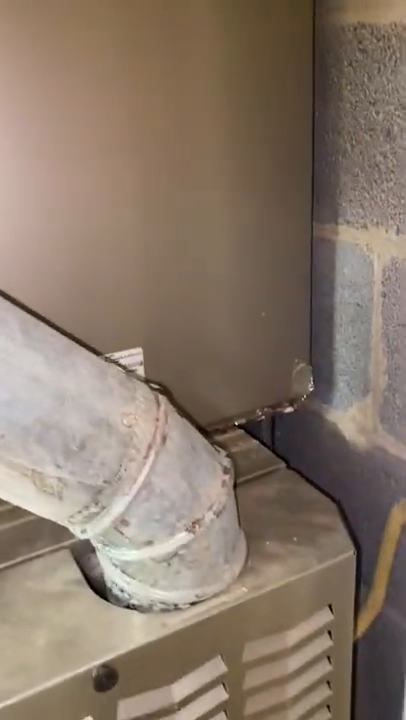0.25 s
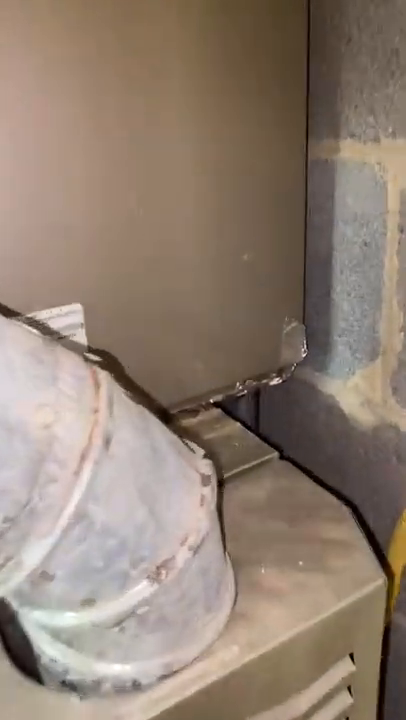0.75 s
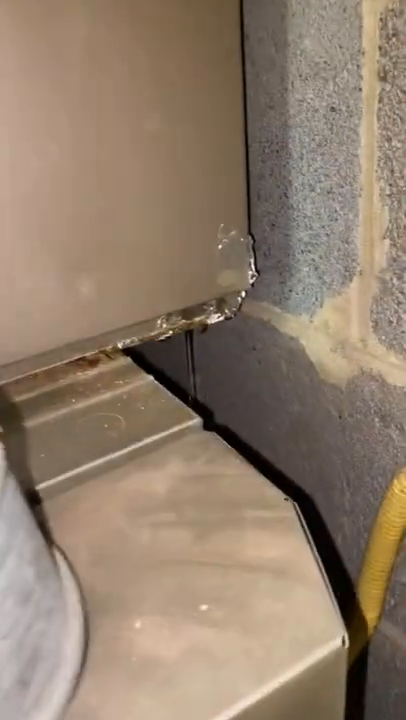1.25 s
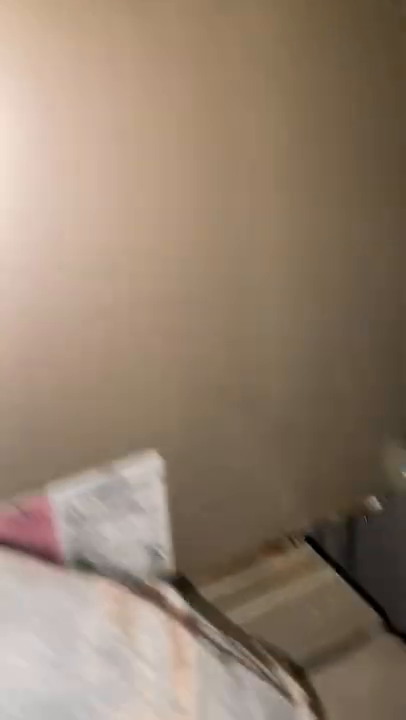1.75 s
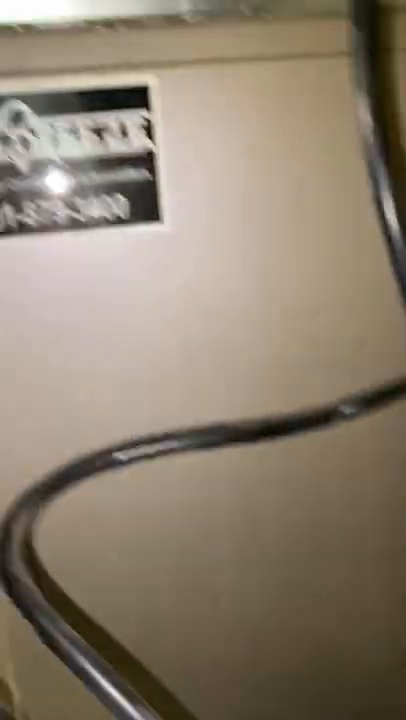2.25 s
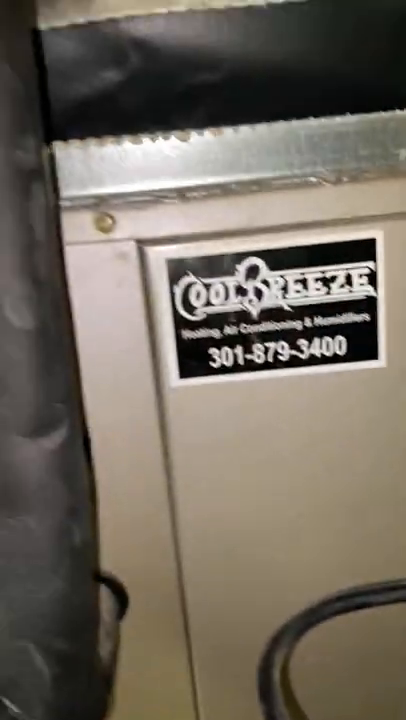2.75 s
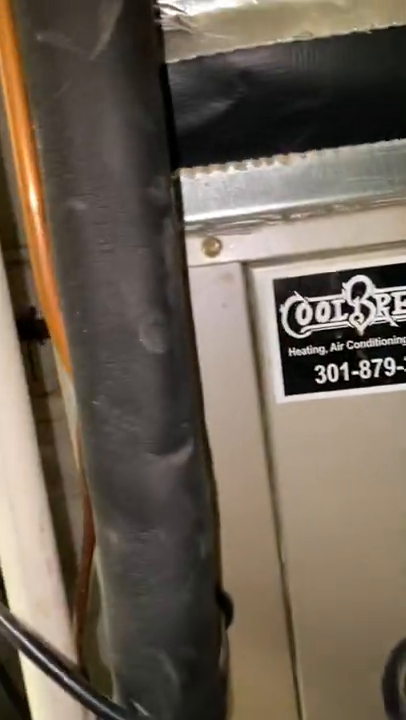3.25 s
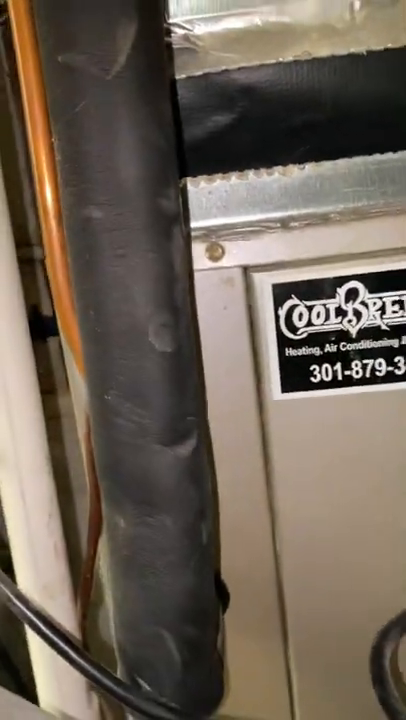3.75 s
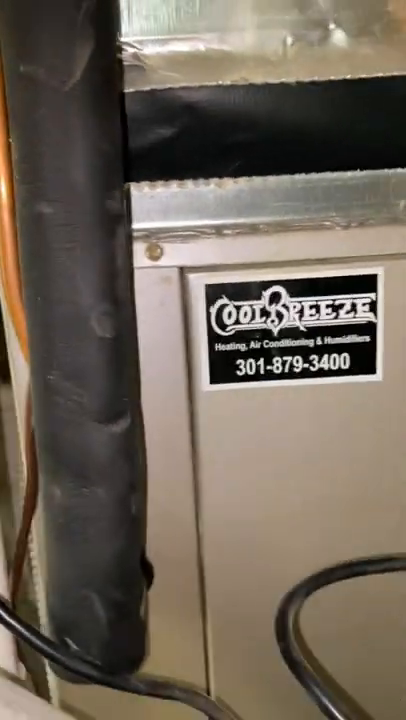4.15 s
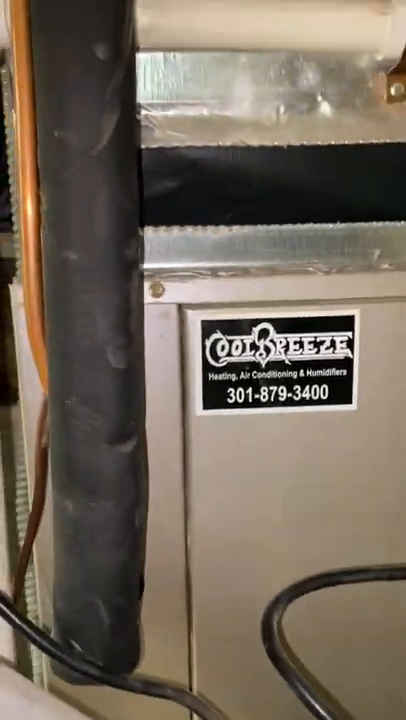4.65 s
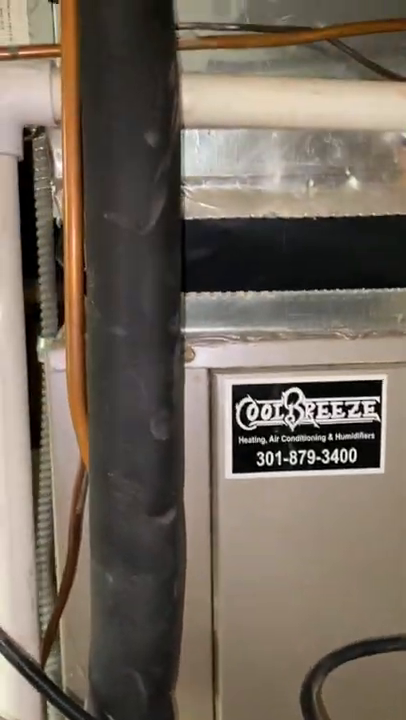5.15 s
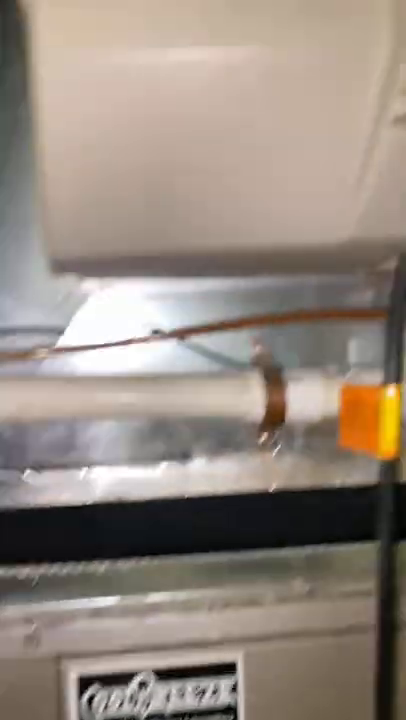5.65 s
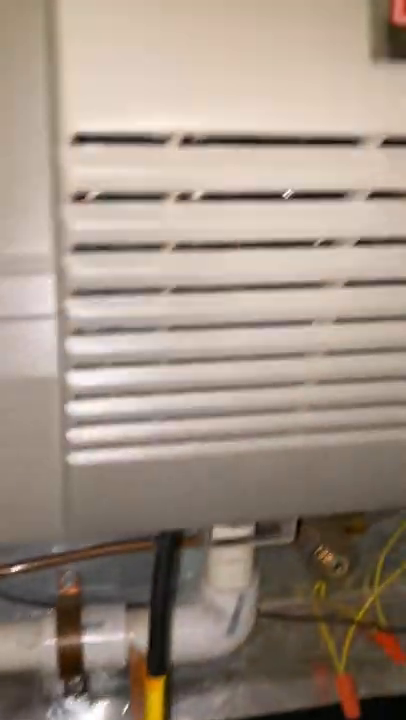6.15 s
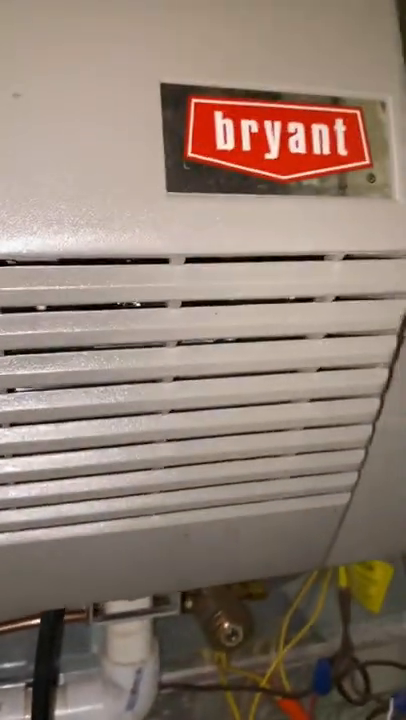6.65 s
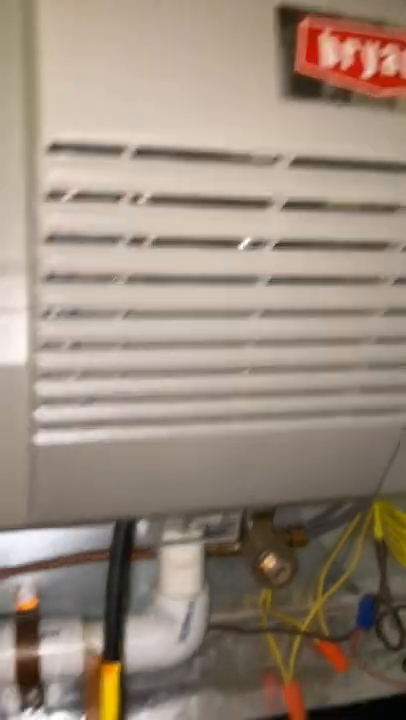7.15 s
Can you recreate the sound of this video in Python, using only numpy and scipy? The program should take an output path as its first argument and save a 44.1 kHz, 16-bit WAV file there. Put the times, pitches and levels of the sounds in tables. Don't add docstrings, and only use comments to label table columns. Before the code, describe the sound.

Close stereo phone pickup of a running blower: low mains hum beating against the fan wheel, a faint steady whine leaning left at first and later centred, and broad airy roar with wavering pipe-like whistles. A few tiny metallic ticks occur in the first second and a half, then fingers bump the phone body repeatedly. The later part is mostly steady hum and rushing air, fuller near the grille, with isolated taps to the end.

```python
import sys
import numpy as np
from scipy import signal
from scipy.fft import rfft, irfft
from scipy.io import wavfile
from scipy.ndimage import uniform_filter1d

SR = 44100
rng = np.random.default_rng(int(sys.argv[2]) if len(sys.argv) > 2 else 0)


def rack_gain(trim_db):
    fader = np.asarray(trim_db, float)
    return 10 ** (fader / 20)


def store_pcm(level_fs):
    pcm = np.round(np.clip(level_fs, -1, 1) * 32767).astype(np.int16)
    wavfile.write(sys.argv[1], SR, np.atleast_2d(pcm).T)


N = 326781


def evened(x):
    return x / np.sqrt(np.mean(x ** 2) + 1e-20)


def wander(count, size):
    return evened(uniform_filter1d(rng.standard_normal(count), size=size))


def blurred(noise, bins, frames):
    return evened(uniform_filter1d(uniform_filter1d(noise, size=bins, axis=0), size=frames, axis=1))


def over_time(rows, t):
    s, *columns = np.transpose(rows)
    return np.array([np.interp(t, s, column) for column in columns])


def over_hz(points, values, hz):
    return np.interp(np.log(hz + 1), np.log(np.asarray(points) + 1), values)


def add(mix, s, sound):
    part = mix[:, round(s * SR):][:, :sound.shape[1]]
    part += sound[:, :part.shape[1]]


# [time_s, nearness_to_cabinet_db, facing_duct_seam_db, facing_grille_db]
PHONE_WALK = [(0, -5.5, -5.5, 2), (.4, -3, -2.5, -1), (.8, -2, -3.5, 1), (1.2, -1, -5, -0.5),
              (1.6, 1, -6.5, -2.5), (1.85, 0, -2.5, -1.5), (2.1, 0.1, 3, -0.2), (2.6, 0.7, 2.5, 0),
              (3.2, 0.7, 1.3, -0.1), (3.8, 1.1, 1.6, -1.3), (4.4, 1.4, 3, 0), (5.1, 0.2, 3, 2),
              (5.4, 2.5, -0.3, 4.5), (5.7, 3, -1.5, 8.5), (6.0, 4, 1.5, 9), (6.4, 6.5, -4.5, 10.5),
              (6.9, 3.5, 0, 10), (7.41, 3.5, -1.5, 7.5)]
# [time_s, lead_turns]
SHAFT_LEAD = [(0, .075), (.4, .09), (1.6, .078), (2.4, .11), (4.4, .121), (5.6, .092), (6.4, .097),
              (6.8, .08), (7.41, .078)]
TONE_ORDERS = [
    (0, 1),
    (0, 2),
    (5, 0),
    (10, 0),
    (22, 0),
    (22, 1),
]
# [rest_level_db, share_of_nearness, share_of_duct, share_of_grille]
TONE_LEVELS = [(-36, 1.1, -0.14, -0.0017), (-47, 1.1, 0.67, -0.49), (-38, 1.3, -0.016, -0.11),
               (-43.5, 0.092, -0.1, 0.81), (-53.5, 1.32, 0.71, 0.31), (-52, 0.01, -.1, 0.92)]
# [shaft_order, hum_multiple, level_under_slot_tone_db]
SLOT_PARTNERS = [(22.23, 2, -7), (22.23, -1, -12.5), (23.2, 1, -11.5), (14.93, 0, -26), (0, 3, -13),
                 (1.013, 2, -6), (19.4, 0, -14)]
# [time_s, left_minus_right_db]
SLOT_PAN = [(0, 23), (2.5, 25), (4.5, 5), (5.5, 2), (7.41, 3)]


def motor():
    hum_hz, hum_start_turns, shaft_hz = 120.0, -.16, 22.52
    waver_db, full_waver_hz = 3, 450
    t = np.arange(N) / SR
    hum = hum_hz * t + hum_start_turns
    shaft = shaft_hz * t + over_time(SHAFT_LEAD, t)[0]

    def tone(order, multiple, db):
        return np.sqrt(2) * rack_gain(db) * np.cos(2 * np.pi * (order * shaft + multiple * hum))

    levels = np.array(TONE_LEVELS)
    *low_db, slot_db = levels[:, :1] + levels[:, 1:] @ over_time(PHONE_WALK, t)
    tones = [(order, multiple, db) for (order, multiple), db in zip(TONE_ORDERS, low_db)]
    tones += [(order, multiple, slot_db + db) for order, multiple, db in SLOT_PARTNERS]

    drifts = rng.standard_normal((N // 441 + 1, len(tones)))
    drifts = evened(uniform_filter1d(drifts, size=12, axis=0))
    low = 0
    for (order, multiple, db), drift in zip(tones, drifts.T):
        drift = np.interp(t, np.arange(len(drift)) / 100, drift)
        pitch_hz = order * shaft_hz + multiple * hum_hz
        depth_db = waver_db * min(pitch_hz / full_waver_hz, 1) ** 2
        low = low + tone(order, multiple, db + depth_db * drift)

    flutter_db = 2.36 * wander(N, 3000)
    left = 1 / (1 + rack_gain(-over_time(SLOT_PAN, t)[0]))
    return low + 2 * np.array([left, 1 - left]) * tone(*TONE_ORDERS[-1], slot_db + flutter_db)


# [peak_s, pipe_hz, lift_db, rise_s, fall_s]
PIPE_BEAMS = [(0.01, 1331, 11, 0.19, .2), (2.22, 1331, 8.5, .25, 0.49), (4.1, 3995, 8.5, 0.17, 0.3),
              (6.3, 3505, 5, 0.12, 0.16), (7.0, 3995, 4, .3, 0.23), (2.15, 1954, 4, 0.052, 0.41),
              (5.05, 1954, 6, 0.18, 0.18), (2.1, 937, -13, 0.62, 0.49), (7.13, 1040, 3.5, 0.38, .3),
              (0.57, 1954, -4, 0.13, 0.16)]


def beam_db(pipe_hz, t):
    lift = 0
    for peak_s, hz, db, rise_s, fall_s in PIPE_BEAMS:
        if abs(np.log2(hz / pipe_hz)) < 1 / 10:
            lift = lift + db * np.exp(-((t - peak_s) / np.where(t < peak_s, rise_s, fall_s)) ** 2)
    return lift


# [pitch_hz, level_db_per_hz]
AIR_ROAR = [(25, -116), (47, -61), (85, -54.5), (215, -59.5), (270, -64.5), (700, -72), (1050, -77),
            (1500, -82), (2150, -78), (2560, -85), (3000, -78.5), (4400, -84.5), (5200, -85.5),
            (10500, -85.5), (16000, -88)]
# [pitch_hz, share_of_nearness, share_of_duct, share_of_grille]
ROAR_SHARES = [(70, 0.79, 0.17, 0.01), (366, 0.19, 0.01, 0.24), (910, 0.74, 0.33, 0.41),
               (3250, 0.18, 0.14, 0.16), (7500, .5, .3, 0.17), (10600, 0.27, .5, .1),
               (14000, 0.77, 0.46, .2)]
# [pitch_hz, width_hz, rest_level_db, share_of_duct, share_of_grille]
DUCT_PIPES = [(1322, 60, -56, 0.54, 0.01), (1965, 60, -50, 1.2, 0.06), (2297, 34, -56.5, 0.55, 0.2),
              (1800, 74, -56, 1.7, 0.092), (1042, 70, -53, 0.69, 0.51), (948, 39, -55, 1.2, .4),
              (4730, 170, -60.5, 0.27, 0.56), (3505, 80, -55.5, 1.2, 0.27), (3980, 98, -58.5, 1.2, 0.46),
              (5050, 120, -66, .2, 0.96), (2934, 45, -66, 0.25, .3)]
# [pitch_hz, likeness_0_to_1, right_lag_radians]
PORTS = [(60, .999, 0), (200, .99, 0), (350, .9, 0), (800, .58, -.2), (1400, .6, 0), (1950, .95, .2),
         (2800, .5, .7), (4000, .8, .5), (4600, .6, 1.5), (5500, .85, .7), (7350, .93, 3.14),
         (10600, .93, 6.28), (13600, .93, 9.42), (16300, .93, 12.56)]


def air():
    streak_db, patch_db, gust_db = 2.5, 1.1, .7
    size, hop = 2048, 512
    frames, hz = N // hop + 5, np.fft.rfftfreq(size, 1 / SR)
    t = np.arange(frames) * hop / SR
    a, b, c, d, streaks, patches, slant = rng.standard_normal((frames, len(hz), 7)).T

    streaks = blurred(streaks, bins=4, frames=40)
    streaks = streaks * np.interp(hz, [0, 800, 2500, 9000], [0, .8, 1.5, 1.7])[:, None]
    patches = blurred(patches, bins=25, frames=6)
    gusts = wander(frames, 3) * np.clip(hz / 8000, 0, 1)[:, None]

    walk_db = over_time(PHONE_WALK, t)
    shares = np.array(ROAR_SHARES)
    place_db = shares[:, 1:] @ walk_db
    place_db -= place_db.mean(1, keepdims=True)
    moved_db = np.array([over_hz(shares[:, 0], column, hz) for column in place_db.T]).T
    roar_db = over_hz(*np.transpose(AIR_ROAR), hz)[:, None]
    power = rack_gain(roar_db + moved_db + streak_db * streaks / 2) ** 2
    for pipe_hz, width, db, duct, grille in DUCT_PIPES:
        shape = 1 / (1 + (2 * (hz - pipe_hz) / width) ** 2) ** 2 / width
        pipe_db = db + duct * walk_db[1] + grille * walk_db[2] + beam_db(pipe_hz, t)
        power = power + shape[:, None] * rack_gain(pipe_db) ** 2

    port_hz, same, lag = np.transpose(PORTS)
    same = np.clip(over_hz(port_hz, same, hz), 0, 1)[:, None]
    sway = 1 + 0.027 * wander(frames, 3)
    slant = blurred(slant, bins=8, frames=40)
    slant_hz, slant_radians = [300, 1200, 1950, 2800, 5500, 6500], [0, .5, .3, .9, .7, .2]
    slant = slant * np.interp(hz, slant_hz, slant_radians)[:, None]
    turn = np.exp(-1j * (np.interp(hz, port_hz, lag)[:, None] * sway + slant))
    left = a + 1j * b
    right = turn * (same * left + np.sqrt(1 - same ** 2) * (c + 1j * d))
    z = np.array([left, right])
    z *= np.sqrt(power * SR / size)
    z *= rack_gain(streak_db * streaks / 2 + patch_db * patches + gust_db * gusts)
    return 1.068 * signal.istft(z, nperseg=size, noverlap=size - hop)[1][:, :N]


# [start_s, peak_db]
FINGER_KNOCKS = [(.345, -42), (0.525, -40), (1.579, -34), (1.597, -33), (1.605, -27), (1.637, -28),
                 (1.65, -39), (1.718, -30), (1.758, -29), (1.838, -35), (1.877, -26.5), (1.905, -26),
                 (2.047, -36), (2.2, -23), (2.277, -26), (2.339, -24), (2.411, -26), (3.38, -48),
                 (3.807, -32), (4.197, -47), (4.94, -34), (5.881, -39), (6.642, -39), (7.158, -26),
                 (7.367, -43), (7.376, -26)]


def knocks():
    turns, bend_s, rise_s, fade_s = 1.99, 0.00129, 0.00042, 0.013
    out, t = np.zeros((2, N)), np.arange(1600) / SR
    for (s, db), (u, v) in zip(FINGER_KNOCKS, rng.random((len(FINGER_KNOCKS), 2))):
        phase_turns = turns * (0.82 + 0.15 * u) * np.log(1 + t / bend_s) + v
        sweep = np.sin(2 * np.pi * phase_turns)
        sweep *= (1 - 0.52 * np.exp(-t / rise_s)) * np.exp(-(t / fade_s) ** 2)
        add(out, s, rack_gain(db + 1.5) * np.outer([1, -.75], sweep))
    return out


# [start_s, level_db, pitch_hz, width_hz, time_to_fall_60_db_s]
METAL_TICKS = [(.553, -37.5, 10000, 3000, 0.036), (.691, -30, 2220, 250, 0.035),
               (.692, -29, 630, 393, 0.093), (.705, -28.5, 330, 500, 0.036),
               (1.609, -35.5, 1300, 1200, 0.035), (1.655, -40.5, 650, 400, 0.057),
               (.882, -30.5, 10200, 9000, 0.02), (1.427, -24, 10800, 6000, 0.0081),
               (1.474, -33.5, 8000, 5050, 0.013), (3.677, -30.5, 6260, 1800, .04),
               (4.395, -31, 7760, 5000, 0.07), (6.316, -34, 7460, 3000, 0.034),
               (6.977, -29.5, 11000, 5000, 0.023)]


def ticks():
    out, t = np.zeros((2, N)), np.arange(3000) / SR
    port_hz, _, lag = np.transpose(PORTS)
    turn = np.exp(-1j * (np.interp(np.fft.rfftfreq(len(t), 1 / SR), port_hz, lag) + 0.42))
    bursts = rng.standard_normal((len(METAL_TICKS), len(t)))
    for (s, db, hz, width, t60), burst in zip(METAL_TICKS, bursts):
        edges_hz = [hz - width / 2, hz + width / 2]
        band = signal.butter(2, edges_hz, "bandpass", fs=SR, output="sos")
        ring = evened(signal.sosfilt(band, burst))
        ring = ring * rack_gain(db - 60 * t / t60) * np.minimum(t / 0.0019, 1)
        add(out, s, np.array([ring, irfft(rfft(ring) * turn)]))
    return out


def scene():
    return motor() + air() + knocks() + ticks()


def top_cut(x):
    return signal.sosfilt(signal.butter(12, 17070, fs=SR, output="sos"), x)


def record(dry):
    return top_cut(dry)


dry = scene()
out = record(dry)
store_pcm(out)
```